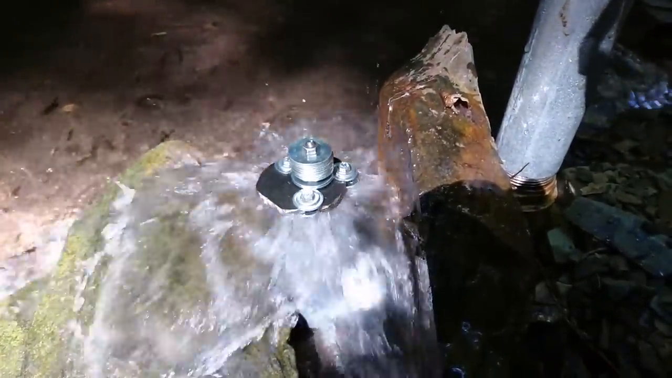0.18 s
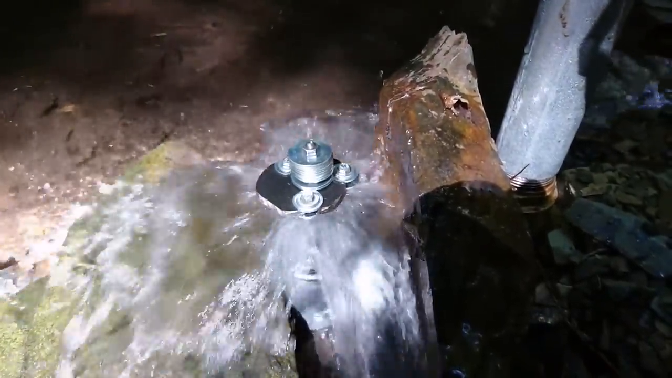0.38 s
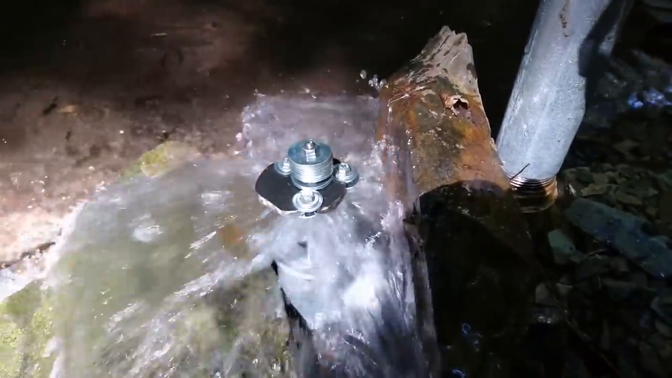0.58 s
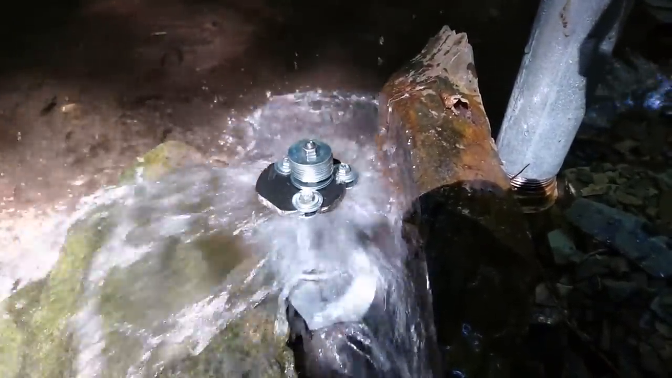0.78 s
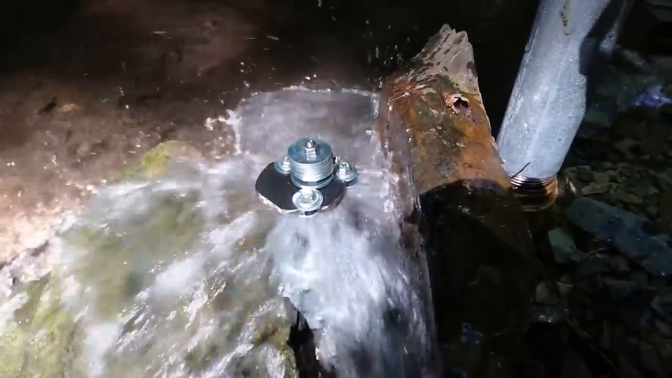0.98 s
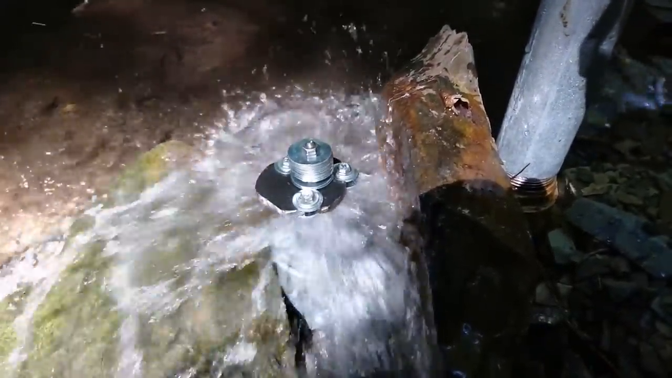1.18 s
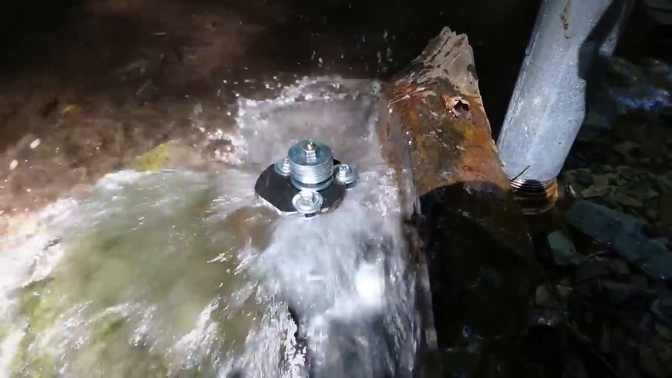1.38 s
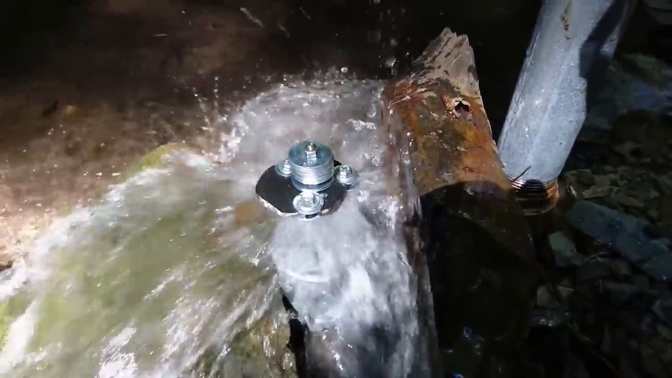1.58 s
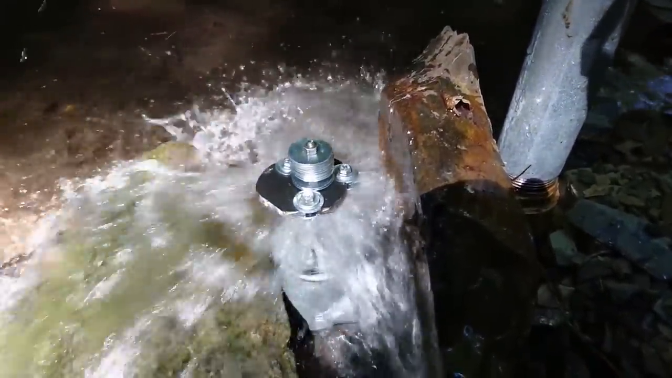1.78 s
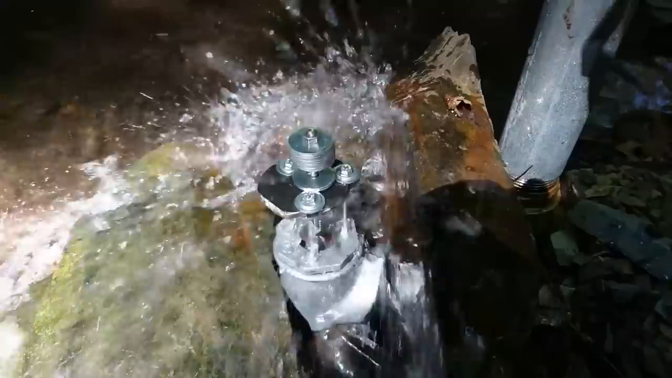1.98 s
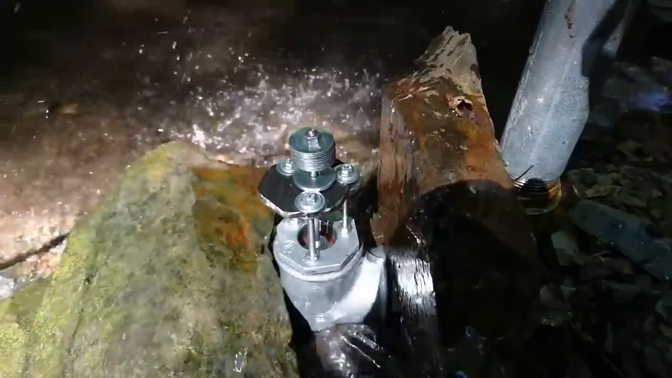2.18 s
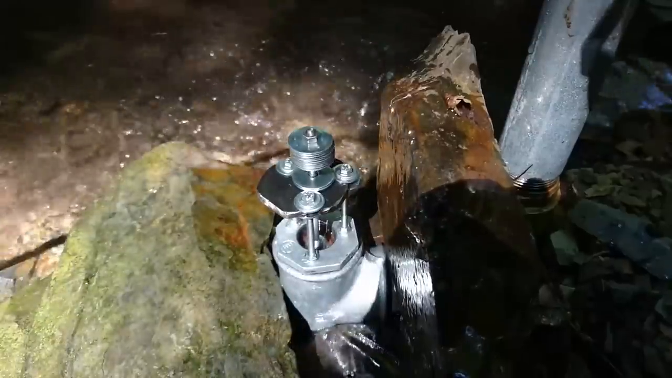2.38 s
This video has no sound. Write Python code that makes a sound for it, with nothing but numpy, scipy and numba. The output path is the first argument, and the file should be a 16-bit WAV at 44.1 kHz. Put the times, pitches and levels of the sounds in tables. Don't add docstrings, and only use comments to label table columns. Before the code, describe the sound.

Water gushes from a pump valve onto rocks, close and bright in stereo. It starts fairly soft, hissing and bubbling, and swells unevenly from 0.25 seconds, with crisp slaps and plops strongest between 1.1 and 1.95. At about 1.98 a short hollow knock shuts the valve. Spray patters until 2.2, then sparse tiny drips remain to 2.45 over faint pipe gurgle and distant creek.

```python
import sys
import numpy as np
from scipy import signal
from scipy.fft import rfft, irfft, next_fast_len
from scipy.io import wavfile
from numba import njit

SR = 44100
rng = np.random.default_rng(int(sys.argv[2]) if len(sys.argv) > 2 else 0)


def rack_gain(trim_db):
    fader = np.asarray(trim_db, float)
    return 10 ** (fader / 20)


def int16_out(signal):
    q = np.round(np.clip(np.atleast_2d(signal).T, -1, 1) * 32767)
    wavfile.write(sys.argv[1], SR, q.astype(np.int16))


N = 108045


def rms_one(x):
    return x / np.sqrt(np.mean(x ** 2) + 1e-20)


def at_hz(points, hz):
    table_hz, value = np.transpose(points)
    return np.interp(np.log(hz), np.log(table_hz + 1), value)


def over_time(points):
    return np.interp(np.arange(N) / SR, *np.transpose(points))


def drift(rate):
    r = np.exp(-40 * np.pi * rate / SR)
    white = rng.standard_normal(N // 20 + 3002)
    slow = signal.lfilter([1], [1, -2 * r, r * r], white)[3000:]
    return np.interp(np.arange(N) / 20, np.arange(len(slow)), rms_one(slow))


def band_pass(x, low_hz, high_hz):
    return signal.sosfilt(signal.butter(2, [low_hz, high_hz], "band", fs=SR, output="sos"), x)


# frequency in Hz, likeness (1 = same).
PORT_LIKENESS = [(60, 1), (300, 0.52), (900, 0.87), (2000, 0.42), (5000, 0.27), (12000, 0.17)]


def band_noise(spectrum, patchy_db):
    out = 0
    together = 0.4 * drift(9) + drift(35)
    edges = 40 * 2 ** np.arange(0, 8.7, 1 / 3)
    white = rng.standard_normal((3, 2, N))
    for k, (low, high) in enumerate(zip(edges, edges[1:])):
        mid, side = band_pass(white[k % 3], low, high)
        hz = np.sqrt(low * high)
        alike = np.clip(at_hz(PORT_LIKENESS, hz), -1, 1)
        flicker = 0.66 * together + 0.84 * drift(28)
        gain = rack_gain(at_hz(spectrum, hz) + patchy_db * flicker)
        stereo = np.sqrt(1 + alike) * mid + np.sqrt(1 - alike) * side * [[1], [-1]]
        out = out + gain * stereo
    return rms_one(out)


@njit
def add(out, s, gain, hz, length, lag, pan, rise, attack, sr):
    for g in range(len(s)):
        first = int(s[g] * sr)
        last = min(first + int(2 * length[g] * sr) + 20, out.shape[1])
        for i in range(max(first - 20, 0), last):
            for c in range(2):
                t = i / sr - s[g] - lag[g] * (c - .5)
                if t > 0:
                    u = t / length[g]
                    swell = np.sin(.5 * np.pi * min(u / attack, 1.)) ** 2
                    swell *= np.exp(-3 * max(u - attack, 0.) ** 1.5)
                    cycles = hz[g] * t * (1 + rise[g] * (.5 * u - .3))
                    out[c, i] += gain[g] * pan[g] ** (.5 - c) * swell * np.sin(2 * np.pi * cycles)


def bubbles(s, db, hz, length, scatter=0.97, rise=0.087):
    spread_cycles, pan_spread_db, attack_share = 0.21, 4.5, 0.16
    luck, out = rng.standard_normal((len(s), 3)), np.zeros((2, N))
    lag = scatter * spread_cycles * luck[:, 0] / hz
    pan = rack_gain(scatter * pan_spread_db * luck[:, 1])
    climb = rise * (1 + 0.54 * scatter * luck[:, 2])
    add(out, s, rack_gain(db), hz, np.clip(length, .0003, .1), lag, pan, climb, attack_share, float(SR))
    return out


# time in seconds, level in dB.
GUSH_FLOW = [(0, -46), (.07, -48.5), (.1, -45), (.25, -43), (.55, -37.5), (.6, -40.5), (.76, -35.5),
             (1.02, -37.5), (1.14, -35), (1.27, -35), (1.39, -39.5), (1.42, -34.5), (1.95, -33.5),
             (2.03, -38.5), (2.192, -39), (2.222, -48), (2.3, -55), (2.45, -58)]
# frequency in Hz, density in dB per Hz.
SPRAY_COLOUR = [(290, -22), (500, -23), (1580, -8.5), (2040, -14), (4380, -1.5), (8600, -14), (10100, -12),
                (14000, -14), (15500, -36)]


def gush():
    hiss_db, fizz_db, bubble_db = -6, -3, -8
    flow, full_flow = rack_gain(over_time(GUSH_FLOW)), rack_gain(-35)
    hiss_level = flow * rack_gain(hiss_db) * (flow / full_flow) ** 0.085
    hiss = band_noise([(250, -72)] + list(SPRAY_COLOUR), patchy_db=2.3)
    fizz = swarm(1483, 10750, cycles=6.9, size_db=2.5, clump_db=2.5, count=7000)
    bubbling = swarm(697.2, 7500, cycles=16.5, size_db=3, clump_db=2.5, count=2600)
    return (hiss_level + spits()) * hiss + flow * rack_gain(fizz_db) * fizz + flow * rack_gain(bubble_db) * bubbling


def swarm(low_hz, high_hz, cycles, size_db, clump_db, count):
    luck = rng.random((count, 4))
    s = luck[:, 0] * (N - 1) / SR
    hz = low_hz * (high_hz / low_hz) ** luck[:, 1]
    crowding = np.minimum(0.39 * drift(19.0) + 0.91 * drift(45), 1.8)
    clump = clump_db * crowding[(s * SR).astype(int)]
    size = -size_db * np.log(luck[:, 2] + 0.019)
    db = at_hz(SPRAY_COLOUR, hz) + 10 * np.log10(hz) + clump + size
    return rms_one(bubbles(s, db, hz, cycles * (.5 + luck[:, 3]) / hz))


# start in seconds, peak in dB, pitch in Hz.
ROCK_SLAPS = [(0.094, -27, 4230), (0.1475, -33, 4170), (0.1836, -26.5, 3590), (0.215, -29, 4600),
              (0.2423, -28.5, 2580), (0.2526, -26, 6100), (0.2722, -24.5, 4400), (0.3476, -30, 4670),
              (0.3868, -25.5, 3820), (0.409, -24.5, 2830), (0.449, -36, 4360), (0.4873, -24, 4440),
              (0.54, -26, 4750), (0.5911, -28, 3600), (0.693, -24, 4490), (0.757, -29, 4450),
              (0.803, -30, 5970), (0.9083, -26, 4360), (0.9547, -21, 4680), (0.9751, -23.5, 4380),
              (0.7665, -22.5, 4300), (0.932, -22.5, 4420), (1.0874, -21, 3480), (1.1016, -25, 4300),
              (1.268, -26, 5400), (1.1266, -15, 4330), (1.2377, -21, 4400), (1.1615, -27, 4150),
              (1.591, -23.5, 6400), (1.749, -26.5, 3000), (1.81, -18, 3660), (1.844, -22.5, 4400),
              (1.906, -22, 4180), (1.936, -24, 4400), (1.3054, -28, 4240), (1.3468, -22, 4750),
              (1.4087, -22.5, 4490), (1.413, -22, 5460), (1.425, -23, 4490), (1.4666, -26, 4660),
              (1.5025, -20.5, 4230), (1.5198, -22, 6300), (1.577, -21, 3830), (1.614, -34, 4270),
              (1.6349, -20.5, 4450), (1.6631, -22, 4480), (1.697, -16.5, 3630), (1.7831, -22, 4500),
              (1.8647, -21.5, 6200), (1.9618, -20, 3250), (1.9697, -14, 4700), (2.125, -25, 4260),
              (2.0664, -21, 3740), (2.1096, -29, 4360), (2.1529, -23, 3920), (2.166, -26.5, 3750),
              (2.3862, -39, 3570)]


def spits():
    spit_db, t60_s, rise_s = -12.5, 0.018, 0.00055
    s, db, _ = np.transpose(ROCK_SLAPS)
    clicks = np.full(N, 1e-18)
    clicks[(s * SR).astype(int)] = rack_gain(db + spit_db)
    rise, fall = np.exp(-1 / (rise_s * SR)), rack_gain(-60 / (t60_s * SR))
    falling = signal.lfilter([1], [1, -fall], clicks)
    return signal.lfilter([1 - rise], [1, -rise], falling)


def slaps():
    return splashes(ROCK_SLAPS, cycles=17, spread=0.292, loss_db=4)


# start in seconds, peak in dB, pitch in Hz.
AIR_PLOPS = [(0.12, -33.5, 1600), (0.26, -23.5, 1650), (0.304, -32, 1076), (0.33, -27.5, 1570),
             (0.418, -29.5, 1374), (0.054, -41, 875), (0.54, -35.5, 942), (0.566, -27.5, 1420),
             (0.607, -36, 975), (0.678, -35.5, 1020), (0.628, -31, 1456), (0.716, -27.5, 1400),
             (0.771, -24.5, 1740), (0.804, -24, 1870), (0.853, -27.5, 1480), (0.999, -37, 977),
             (1.064, -29, 1550), (1.163, -24, 2640), (1.358, -33.5, 1150), (1.408, -29.5, 1620),
             (1.481, -29, 1520), (1.493, -27, 1590), (1.52, -27, 1560), (1.647, -26, 1560),
             (1.747, -42, 1480), (1.261, -35.5, 1300), (1.478, -35.5, 1010), (1.541, -31, 1420),
             (1.613, -38, 969), (1.807, -30, 1600), (1.842, -32, 1000), (1.881, -32.5, 1110),
             (1.892, -24, 1570)]


def plops():
    return splashes(AIR_PLOPS, cycles=10, spread=0.32, loss_db=4)


def splashes(table, cycles, spread, loss_db):
    s, db, hz = np.transpose(table)
    luck, length = rng.standard_normal((len(s), 8, 2)), cycles / hz
    small_s = s[:, None] + .5 * length[:, None] * abs(luck[..., 0]) ** 1.5
    small_db = np.repeat(db - loss_db - 8.5, 8)
    small_hz = hz[:, None] * np.exp(spread * luck[..., 1])
    around = bubbles(small_s.ravel(), small_db, small_hz.ravel(), np.repeat(0.29 * length, 8))
    return bubbles(s, db - 6.5, hz, length, scatter=0.32) + around


# start in seconds, peak in dB, pitch in Hz, length in seconds.
VALVE_KNOCK = [(1.973, -25.5, 970, 0.01), (1.983, -26.5, 650, 0.0058), (1.9855, -19, 805, 0.013),
               (1.983, -26, 2900, 0.0081), (1.985, -26, 1480, 0.018), (1.984, -35, 150, 0.026),
               (1.985, -43.5, 572, 0.026), (1.986, -37, 372, 0.018), (1.997, -32, 900, 0.012),
               (2.03, -46, 191, 0.042), (1.9693, -21, 5700, 0.0018), (1.992, -24, 4600, 0.0045),
               (2.004, -30, 3500, .003), (2.014, -38, 3600, .004)]
# frequency in Hz, density in dB per Hz.
SLAM_COLOUR = [(60, -31), (200, -10.5), (450, -12), (800, -5.5), (2000, -6), (6000, -5), (9000, -24),
               (15000, -20)]


def slam():
    start_s, level_db, t60_s, rise_s, hold_s = 1.972, -28.5, 0.094, 0.013, 0.032
    t = np.maximum(np.arange(N) / SR - start_s, 0)
    fall_db = 60 * np.maximum(t - hold_s, 0) / t60_s
    shape = np.minimum(t / rise_s, 1) * rack_gain(level_db - fall_db)
    knock = bubbles(*np.transpose(VALVE_KNOCK), scatter=0.5, rise=0.032)
    return knock + shape * band_noise(SLAM_COLOUR, patchy_db=3.5)


# start in
# seconds, peak in dB, pitch in Hz, length in seconds.
CLEAN_NOTES = [(0.567, -24, 3260, 0.0023), (.661, -31, 2820, .005), (0.717, -31.5, 1240, .003),
               (.409, -29, 3400, .003), (.94, -26, 4470, 0.0065), (1.211, -23.5, 3470, 0.0049),
               (1.254, -27.5, 4250, 0.0066), (1.733, -26, 2650, 0.0041), (1.127, -25, 3450, 0.008),
               (2.039, -35, 6200, .003), (2.049, -28, 3500, 0.0028), (2.194, -36.5, 1134, 0.022),
               (2.265, -36.5, 3710, 0.0066), (2.267, -37, 4260, 0.0059), (2.308, -47, 4900, .006),
               (2.321, -42, 2560, 0.0074), (2.361, -50, 1470, 0.014), (2.361, -48, 2230, .006),
               (2.342, -51, 1700, .006), (2.421, -49, 1500, 0.0087), (2.364, -42.5, 5860, 0.0053),
               (2.42, -44, 3000, 0.0017), (2.434, -46, 4800, .004)]


def clean_notes():
    return bubbles(*np.transpose(CLEAN_NOTES), scatter=0.25, rise=0.067)


# start in seconds, peak in dB, pitch in Hz, length in seconds.
BIG_POCKET = [
    (.889, -37.5, 708, 0.018),
]


def bloop():
    return bubbles(*np.transpose(BIG_POCKET), scatter=.2, rise=0.17)


# time in seconds, level in dB.
PIPE_GURGLE = [(0, -55.5), (.55, -57.5), (.62, -62), (.73, -58.5), (.95, -66.5), (1.35, -62.5), (1.5, -59),
               (1.78, -58), (1.9, -60.5), (2.2, -65.5), (2.45, -68.5)]


def pipe():
    gurgle_hz, width_hz, lumpy_db = 97, 24, 2
    rumble_db, rumble_end_s = -61.5, 2.07
    r, w = np.exp(-np.pi * width_hz / SR), 2 * np.pi * gurgle_hz / SR
    mid, left, right = rng.standard_normal((3, 2, N))
    noise = mid + np.array([left, right]) * [[.3], [.7]]
    gurgle = rms_one(signal.lfilter([1, 0, -1], [1, -2 * r * np.cos(w), r * r], noise[:, 0]))
    gurgle_level = rack_gain(over_time(PIPE_GURGLE) + lumpy_db * drift(8.0))
    rumble = rms_one(band_pass(noise[:, 1], 50, 680))
    fade = 0.38 + 0.84 / (1 + np.exp((np.arange(N) / SR - rumble_end_s) / 0.022))
    return gurgle * gurgle_level + fade * rack_gain(rumble_db) * rumble


# frequency in Hz, density in dB per Hz.
CREEK_COLOUR = [(40, 4), (100, -13), (450, 2), (900, -6.5), (1500, -7.5), (2100, -14), (8000, -22),
                (15000, -17)]


def creek():
    return rack_gain(-60.5) * band_noise(CREEK_COLOUR, patchy_db=2.5)


def scene():
    return gush() + slaps() + plops() + slam() + clean_notes() + bloop() + pipe() + creek()


def low_pass(x):
    return signal.sosfilt(signal.butter(12, 15730, fs=SR, output="sos"), x)


# frequency in Hz, width in Hz, gain in
# dB.
HOUSING_MODES = [(1590, 290, 0.5), (3000, 1680, 2.5), (6530, 1390, 4.5), (9900, 2650, 4.5),
                 (11800, 760, -9.5)]
# frequency in Hz, left minus right in dB.
PORT_TILT = [(300, 0), (800, 4.5), (2200, 0.5), (3500, 5.5), (4600, -2), (6500, -0.1), (8200, -4),
             (9700, 0), (13000, -4)]


def record(dry):
    left_lead_s, detour_s, detour_from_hz = 5 / 44100, .000475, 3450
    mic_low_hz, mic_high_hz = 49.7, 14670
    size = next_fast_len(N + 4096)
    hz = np.arange(size // 2 + 1) * SR / size + 1e-3
    colour_db = sum(db / (1 + (2 * (hz - at) / width) ** 2) for at, width, db in HOUSING_MODES)
    level = rack_gain(colour_db + at_hz(PORT_TILT, hz) * [[.5], [-.5]])
    late_cycles = hz * left_lead_s + detour_s * np.maximum(hz - detour_from_hz, 0)
    ports = level * np.exp(-2j * np.pi * late_cycles * [[0], [1]])
    ports = ports / np.sqrt((1 + (mic_low_hz / hz) ** 8) * (1 + (hz / mic_high_hz) ** 110))
    heard = irfft(rfft(dry, size) * ports, size)[:, :N]
    return low_pass(heard)


dry = scene()
out = record(dry)
int16_out(out)
```